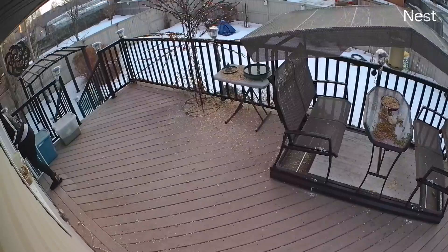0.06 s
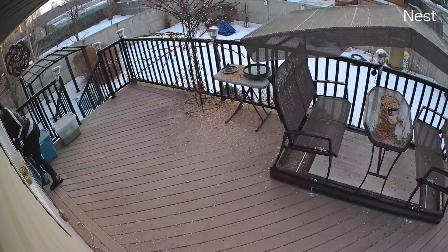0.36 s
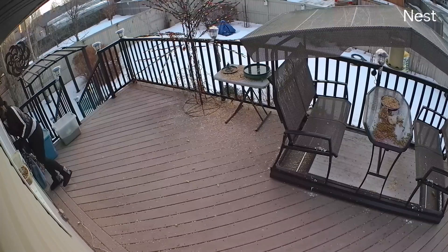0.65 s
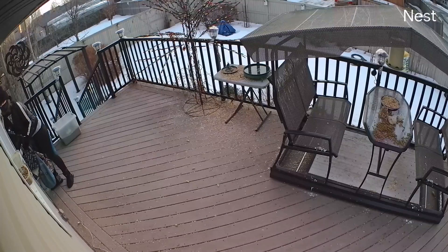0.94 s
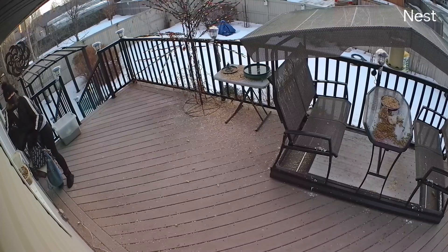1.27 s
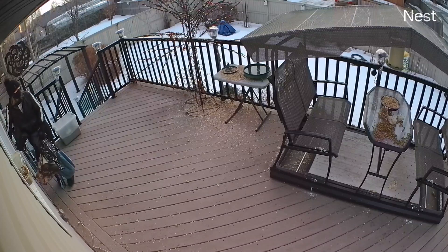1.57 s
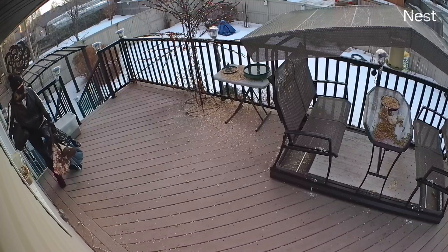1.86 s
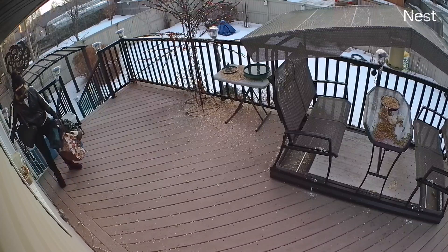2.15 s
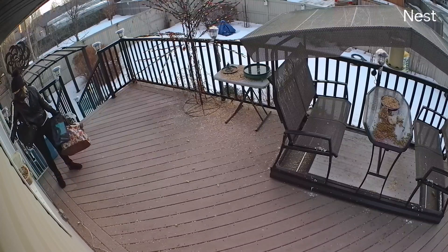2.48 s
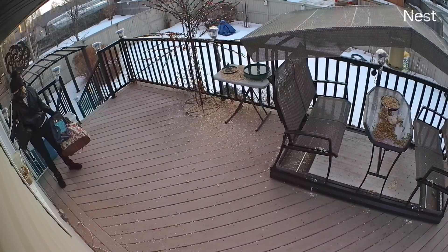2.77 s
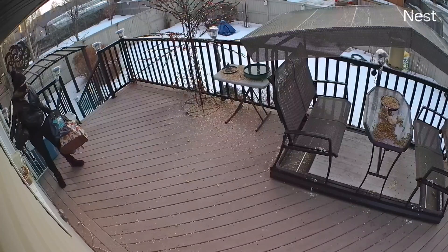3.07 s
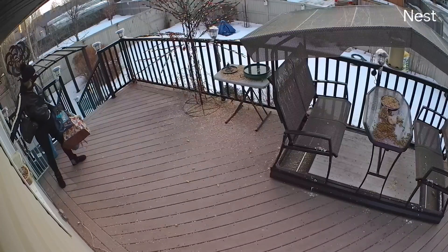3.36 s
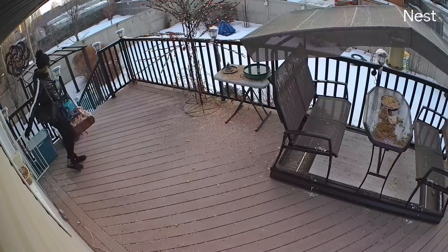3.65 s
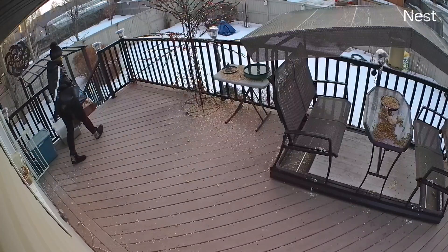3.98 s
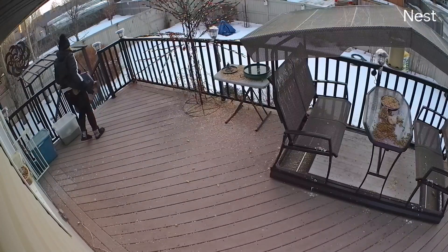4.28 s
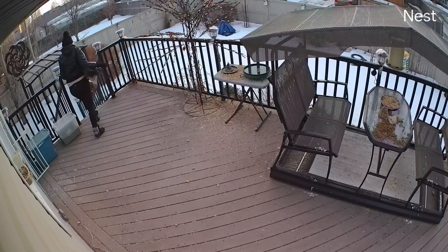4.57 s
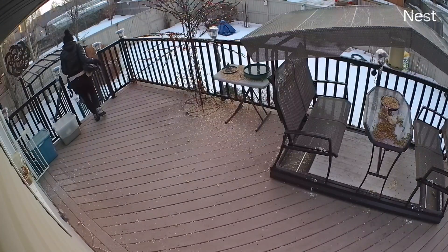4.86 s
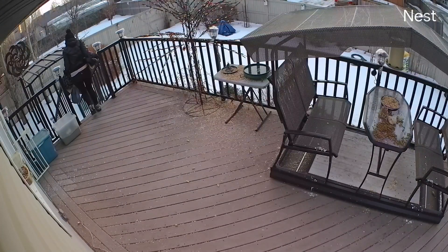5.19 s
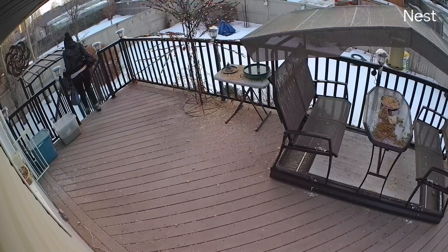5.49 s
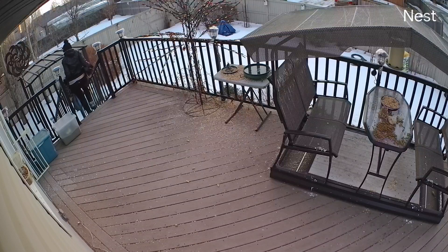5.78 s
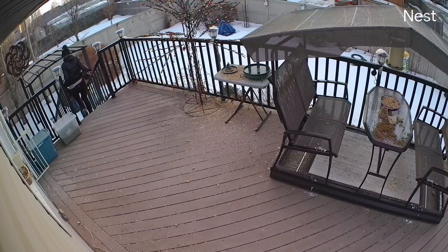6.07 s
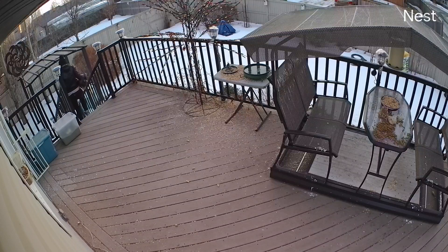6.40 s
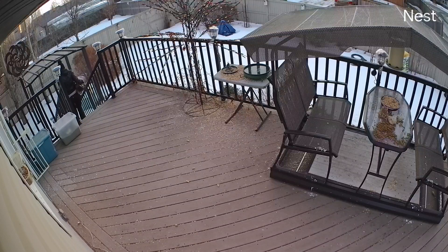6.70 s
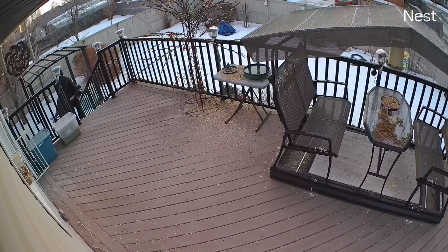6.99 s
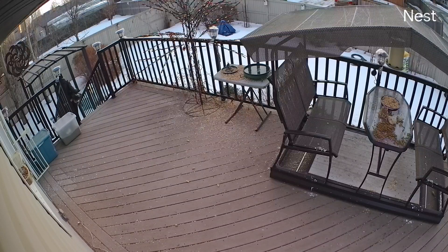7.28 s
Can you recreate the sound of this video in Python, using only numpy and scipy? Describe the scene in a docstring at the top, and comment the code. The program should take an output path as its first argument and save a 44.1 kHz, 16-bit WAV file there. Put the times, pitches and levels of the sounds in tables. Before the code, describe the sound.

The scene is an outdoor wooden deck with a very faint hum of a distant town. It opens quietly, with a soft footstep and a slight brush of paper, then a hollow bump on a stiff paper bag at about 1.5 seconds. At 1.8 seconds the bag is snatched up with a sudden loud crackle, sharp snaps over dense crinkling, easing by 2.6. A second, longer burst, almost like a crash, runs from 2.9 to about 4 seconds and thins to scattered snaps by 4.7. Dull footsteps thud on the boards underneath, the firmest near 3.6, fading after 5. From about 5 seconds a metal gate latch clinks lightly several times with a short ring, quieter than the bag, clearest at 6.3 and 6.6, and stopping near 7. The wall and deck add a brief echo, and a small microphone softens the treble.

```python
"""A paper bag on a wooden deck

A stiff paper gift bag is snatched up at a house door and swung about, crackling as loudly as a crash.
Its large creases buckle with a snap over a dense crinkle of tiny ones, and footfalls set the boards
ringing. Then a gate latch clinks a few times in its metal modes. Wall and deck echo the bag and the
latch, a distant town hums underneath, and a small microphone dulls the treble."""
import sys
import numpy as np
from scipy import signal
from scipy.fft import rfft, irfft
from scipy.io import wavfile

SR = 44100
rng = np.random.default_rng(int(sys.argv[2]) if len(sys.argv) > 2 else 0)


def inscribe(sig):
    """Save sig as 16-bit PCM at rate SR to the path in sys.argv[1].

    A 1-D sig is mono; a 2-D sig holds one channel per row.
    Samples are clipped to [-1, 1] before scaling.
    """
    pcm = np.round(np.clip(np.atleast_2d(sig).T, -1, 1) * 32767)
    wavfile.write(sys.argv[1], SR, pcm.astype(np.int16))


N = 323694


def from_db(db):
    """Amplitude ratio for a level in decibels."""
    return 10 ** (np.asarray(db) / 20)


def unit_rms(x):
    """Normalisation to unit mean power."""
    return x / np.sqrt(np.mean(x ** 2) + 1e-20)


def at_level(sound, db):
    """Energy normalisation: a transient gets the energy of 20 ms at this level."""
    return from_db(db) * sound * np.sqrt(SR / 50 / np.sum(sound ** 2))


def at_hz(points, hz):
    """Interpolation of a spectrum on a logarithmic frequency axis."""
    frequencies, values = np.transpose(points)
    return np.interp(np.log(hz), np.log(frequencies), values)


def band(x, low_hz, high_hz, order=2):
    """Causal band-pass filtering."""
    sos = signal.butter(order, [low_hz, min(high_hz, .45 * SR)], "band", fs=SR, output="sos")
    return signal.sosfilt(sos, x + 1e-18)


def resonance(x, hz, width_hz):
    """A damped resonator with unit gain at its peak."""
    return signal.lfilter(*signal.iirpeak(hz, hz / width_hz, fs=SR), x)


def drift(per_s):
    """Random modulation of unit rms, linear between knots."""
    knots = rng.standard_normal(int(N / SR * per_s) + 2)
    return unit_rms(np.interp(np.arange(N) / SR * per_s, np.arange(len(knots)), knots))


def impulses(per_s, spread_db, size):
    """Shot noise: independent clicks, mostly small and a few large."""
    heights = from_db(spread_db * np.minimum(rng.exponential(1, size), 4))
    return (rng.random(size) < per_s / SR) * heights * rng.choice([-1, 1], size)


def add(out, start_s, sound):
    """Superposition of a sound from a given time on."""
    i = int(start_s * SR)
    out[i:i + len(sound)] += sound[:N - i]


# Spectrum of the town's hum. Each row: frequency in Hz, relative spectral density in dB.
HUM_SPECTRUM = [(25, -10.5), (80, 2.5), (160, -2), (240, -9), (850, -12.5), (1900, -21), (3600, -30.5),
                (10000, -54.5)]
# Course of the hum. Each row: time in seconds, level in dB.
HUM_LEVEL = [(0, -66.5), (2.8, -64), (5.6, -59), (7.34, -59.5)]

def town_hum(waver_db=0.5):
    """Distant sources merge into low broadband noise whose level wavers gently."""
    hz = np.maximum(np.arange(N // 2 + 1) * SR / N, 1)
    wash = irfft(rfft(rng.standard_normal(N)) * from_db(at_hz(HUM_SPECTRUM, hz)), N)
    level_db = np.interp(np.arange(N) / SR, *np.transpose(HUM_LEVEL))
    return unit_rms(wash) * from_db(level_db + waver_db * drift(52))


def microphone_hiss(level_db=-83.5):
    """Self-noise: the microphone adds a steady, band-limited hiss."""
    return from_db(level_db) * unit_rms(band(rng.standard_normal(N), 800, 5000, order=1))


# Steps on deck and stairs. Each row: start in seconds, relative level in dB, pitch most excited in Hz.
FOOTFALLS = [(0.182, -30, 117), (0.202, -38, 380), (1.466, -26.5, 86), (2.209, -28.5, 118),
             (3.119, -26.5, 140), (3.405, -29.5, 114), (3.616, -17.5, 230.8), (3.99, -36.5, 48),
             (4.99, -37, 56), (5.1, -36.5, 56.4), (5.2, -38, 56.4), (5.71, -46.5, 350), (6.122, -48, 370)]
# Modes of the boards. Each row: frequency in Hz, relative level in dB, 60 dB decay time in seconds.
BOARD_MODES = [(55.7, -3.5, 0.55), (93.5, 1.5, 0.17), (118, 0.5, 0.12), (171, -1.5, 0.11), (222, -3, .11),
               (335, 2.5, 0.092)]

def footfalls(swell_cycles=1.22, focus_db_per_octave=15, gain_db=3):
    """Modal excitation: a soft impact drives the modes nearest its pitch; low modes swell more slowly."""
    out, t = np.zeros(N), np.arange(SR) / SR
    for start, db, pitch_hz in FOOTFALLS:
        for hz, mode_db, t60 in BOARD_MODES:
            swell = 1 - np.exp(-(t * hz / swell_cycles) ** 2)
            level_db = db + gain_db + mode_db - focus_db_per_octave * abs(np.log2(hz / pitch_hz))
            tone = np.sin(2 * np.pi * (hz * t + rng.random()))
            add(out, start, from_db(level_db - 60 * t / t60) * swell * tone)
    return out


# Moves of the bag: brush, brush, bump, grip, snatch, lift, slide, tug, swing, swing back, settle.
# Each row: end of attack, hold and release in seconds, relative levels of crumpling and flexing in dB.
BAG_MOVES = [(.39, .02, 0.092, -68, -77.5), (0.779, 0.048, 0.057, -55.5, -69.5),
             (1.49, 0.01, 0.33, -47, -44.5), (1.772, .02, 0.2, -41.5, -62.5),
             (1.857, 0.098, .3, -25.5, -36.5), (2.084, .32, .55, -34, -42), (2.696, .17, .1, -57, -63.5),
             (3.099, 0.11, 0.5, -30.5, -34.5), (3.354, 0.14, .4, -23.5, -26),
             (3.678, 0.031, 0.99, -22.5, -30), (4.383, 0.09, 0.34, -42.5, -50.5)]

def handling(attack_s=0.04, release_power=2.68):
    """Incoherent addition: the moves sum in power, giving the crumpling and flexing levels in dB."""
    t, power = np.arange(N) / SR, 1e-11
    for onset, hold, release, *levels_db in BAG_MOVES:
        attack = np.clip(1 + (t - onset) / attack_s, 0, 1)
        fade = np.clip(1 - (t - onset - hold) / release, 0, 1) ** release_power
        power = power + (from_db(levels_db)[:, None] * attack * fade) ** 2
    return 10 * np.log10(power)


# Spectrum of the crinkle. Each row: frequency in Hz, relative half-octave level in dB.
CRINKLE_SPECTRUM = [(70, -20), (150, -14.5), (230, -11.5), (420, -6.5), (650, 0), (1000, -11), (1700, -1.5),
                    (3000, -2.5), (5000, 2), (7000, -7.5), (9500, -37.5)]

def crinkle(per_s=1500, hiss_db=-10, colour_db=4, clump_db=0.8, patchy_db=2.5, flex_hz=900, fine_hz=2100):
    """Crackling noise of tiny creases: the lows follow the flexing panels, the highs the crumpling."""
    crumple_db, flex_db = handling()
    clumps_db = clump_db * drift(90)
    clicks = impulses(per_s, spread_db=3, size=N)
    out, edges_hz = 0, 55 * 2 ** (np.arange(16) / 2)
    for low, high in zip(edges_hz, edges_hz[1:]):
        hz = np.sqrt(low * high)
        fine_share = at_hz([(flex_hz, 0), (fine_hz, 1)], hz)
        drive_db = (1 - fine_share) * flex_db + fine_share * crumple_db
        db = at_hz(CRINKLE_SPECTRUM, hz) + drive_db + clumps_db + patchy_db * drift(45)
        # new weights in every band give each click its own colour
        weights = from_db(colour_db * rng.uniform(-1.4, 1, N)) * rng.choice([-1, 1], N)
        crackle = unit_rms(clicks * weights) + from_db(hiss_db) * rng.standard_normal(N)
        out = out + from_db(db) * unit_rms(band(crackle, low, high))
    return out


# Resonances of the bag. Each row: frequency in Hz, bandwidth in Hz, gain in dB.
BAG_RESONANCES = [(324, 13, -26.5), (557, 120, -2.5), (696, 91, 2.5), (1372, 300, -2), (2640, 230, -11.5),
                  (3614, 180, -15.5)]

def bag_body(x):
    """Forced vibration: the panels and the hollow of the bag ring briefly with every crease."""
    return x + sum(from_db(db) * resonance(x, hz, width) for hz, width, db in BAG_RESONANCES)


# Knocks on the whole bag. Each row: start in seconds, peak level in dB, pitch of the panel in Hz.
BAG_BUMPS = [(.765, -51, 604), (1.471, -21.5, 700), (2.636, -23, 1022)]

def bumps(swell_cycles=1.6):
    """Heavily damped vibration: a slack panel swells and dies with a hollow note."""
    out, t = np.zeros(N), np.arange(SR // 5) / SR
    for start, db, hz in BAG_BUMPS:
        age = t * hz / swell_cycles
        envelope = np.sqrt(age * np.exp(1 - age))
        add(out, start, from_db(db) * envelope * np.sin(2 * np.pi * hz * t))
    return out


# The bag slides over coat and boards. Each row: centre time and standard deviation in seconds,
# pitch and resonator bandwidth in Hz, level at the centre in dB.
BAG_RUBS = [(.835, 0.0088, 3900, 1500, -55), (1.47, 0.0074, 3000, 400, -51.5), (2.5, 0.26, 135, 70, -53),
            (2.8, .065, 3560, 260, -55.5), (4.87, 0.19, 2500, 1300, -65.5)]

def rubs():
    """Sliding friction makes a band of noise that swells and fades in a bell curve."""
    out, t = 0, np.arange(N) / SR
    for centre, sigma, hz, width_hz, db in BAG_RUBS:
        friction = resonance(resonance(rng.standard_normal(N), hz, width_hz), hz, width_hz)
        envelope = np.exp(-((t - centre) / sigma) ** 2 / 2)
        out = out + from_db(db) * unit_rms(friction) * envelope
    return out


def small_creases(per_s=14, threshold_db=-46, spread_db=3, low_hz=1400, high_hz=4200, decay_s=.0016):
    """Threshold buckling: lesser creases yield at random under hard handling; gives rows for snaps()."""
    crumple_db, flex_db = handling()
    rows = []
    for slot, (when, pitch, crack, body) in enumerate(rng.random((200, 4))):
        start = (slot + when) / per_s
        i = int(start * SR)
        if i < N and crumple_db[i] > threshold_db:
            crack_db = crumple_db[i] - 6 + spread_db * (2 * crack - 1)
            body_db = flex_db[i] - 5 + spread_db * (2 * body - 1)
            rows.append((start, crack_db, body_db, low_hz * (high_hz / low_hz) ** pitch, decay_s))
    return rows


# Large creases buckling. Each row: start in seconds, relative levels of the crack and of the hollow
# body in dB, pitch of the crack in Hz, time constant of the flutter in seconds.
LARGE_CREASES = [(1.771, -29.5, -39.5, 1510, 0.0078), (1.829, -30, -32, 1460, 0.005),
                 (1.843, -15, -23, 1450, 0.0049), (1.879, -13.5, -24, 1840, 0.0052),
                 (1.9, -17, -20.5, 2960, 0.0052), (1.939, -25.5, -29, 3280, .004),
                 (1.979, -29, -30.5, 2600, 0.005), (2.056, -27.5, -36, 2200, 0.0027),
                 (2.089, -26, -60, 3650, 0.0045), (2.136, -24.5, -28, 3300, 0.0055),
                 (2.159, -17.5, -49, 3470, 0.0029), (2.247, -29, -36.5, 3340, 0.0059),
                 (2.28, -26, -26.5, 3730, 0.0058), (2.312, -21.5, -23, 2400, 0.0069),
                 (2.376, -25.5, -29, 3074, 0.0084), (2.426, -31, -34.5, 1350, 0.0025),
                 (2.469, -34.5, -38, 3500, 0.0044), (2.524, -36, -58, 3850, 0.0041),
                 (2.636, -37.5, -33.5, 1150, 0.0037), (2.905, -15.5, -13.5, 4100, 0.004),
                 (3.014, -12, -27, 2600, .007), (3.046, -20, -29, 3200, 0.005),
                 (3.116, -29, -22, 3000, 0.0057), (3.145, -32, -21, 1400, 0.015),
                 (3.358, -14.5, -21.5, 2600, 0.0077), (3.383, -12.5, -18.5, 2090, 0.005),
                 (3.432, -16, -19.5, 1580, 0.0026), (3.503, -24, -31.5, 3965, 0.0018),
                 (3.532, -16, -16, 2390, .005), (3.581, -18.5, -29, 1440, 0.0033),
                 (3.614, -16, -14, 1400, 0.011), (3.663, -17, -16.5, 1600, .006),
                 (3.699, -17.5, -18, 3500, 0.0031), (3.717, -24, -26, 3500, 0.0067),
                 (3.809, -23, -40.5, 3000, 0.0025), (3.857, -24, -26, 2900, 0.0058),
                 (3.903, -28, -26, 1440, 0.0042), (3.94, -25.5, -27, 2500, 0.0029),
                 (4.018, -28.5, -17.5, 1400, 0.0035), (4.062, -22.5, -30.5, 1560, 0.0044),
                 (4.238, -16, -22, 2250, 0.0025), (4.32, -28.5, -24.5, 1300, 0.0049),
                 (4.404, -26.5, -44, 3120, 0.0022), (4.424, -40, -32, 2120, 0.011),
                 (4.521, -25.5, -34.5, 3600, 0.0035), (4.652, -43, -80, 3300, 0.0063)]

def snaps(edges_hz=(370, 1100, 3900, 7400), click_heights=(2.2, -2.1, 1.1), facet_db=13,
          strain_db=-29, strain_s=0.0088, rebound_db=-15, rebound_s=.01):
    """Snap-through buckling: a crease ticks under strain, pops over, and the sheet flutters."""
    pop = SR // 80  # sample at which the crease flips
    out, t = np.zeros(N), np.arange(-pop, SR // 10) / SR
    after = np.maximum(t, 0)
    strain = from_db(strain_db) * np.exp(-abs(t) / strain_s)
    for start, crack_db, body_db, crack_hz, decay in LARGE_CREASES + small_creases():
        click = rng.choice([-1, 1]) * np.exp(-decay / 0.0029)  # a long crease starts more gently
        # a small, high-pitched facet and a long flutter both add treble
        treble_db = crack_db - 13 + 13 * np.log2(crack_hz / 2500) + 9.5 * np.log2(decay / .004)
        release = np.exp(-after / decay) * (1 - np.exp(-after / (0.47 * decay)))
        rebound = from_db(rebound_db) * (t > rebound_s) * np.exp(-abs(t - rebound_s) / decay)
        for k, db in enumerate([body_db, crack_db, treble_db]):
            flutter = impulses(per_s=4000, spread_db=3.5, size=len(t)) * (strain + release + rebound)
            flutter /= np.linalg.norm(flutter)
            flutter[pop] = click_heights[k] * click
            sound = band(flutter, edges_hz[k], edges_hz[k + 1], order=3)
            if k == 1:  # the facet that flips has a pitch of its own
                sound = sound + from_db(facet_db) * resonance(sound, crack_hz, width_hz=900)
            add(out, start + t[0], at_level(sound, db))
    return out


def chatter(t, rise_s=0.0022, bounce_s=0.011, approach_s=0.0062, scrape_s=0.074, scrape_db=-14,
            direct_db=-9, count=18):
    """Repeated contact: loose metal slides in, bounces and scrapes on, waking short-lived resonances."""
    before, after = np.minimum(t, 0), np.maximum(t, 0)
    bounce = (1 - np.exp(-after / rise_s)) * np.exp(-after / bounce_s)
    scrape = from_db(scrape_db) * np.exp(before / approach_s - after / scrape_s)
    contacts = impulses(per_s=3500, spread_db=3.2, size=len(t)) * (bounce + scrape) + 1e-18
    pitches_hz = 1450 * (9300 / 1450) ** ((np.arange(count) + rng.random(count)) / count)
    ringing = sum(from_db(0.65 * rng.normal()) * resonance(contacts, hz, width_hz=170)
                  for hz in pitches_hz)
    return from_db(direct_db) * contacts + ringing


# Blows of the latch. Each row: time in seconds, relative chatter level in dB, tilt in dB per octave,
# frequency of the leading mode in Hz, its level in dB.
LATCH_BLOWS = [(5.065, -56, 7, 6555, -45), (5.469, -56, -3, 2980, -41), (5.474, -76, 0, 1134, -54),
               (5.608, -62, -6, 1590, -69), (5.643, -50, -2.5, 1590, -50), (5.658, -51.5, -5, 1841, -55),
               (5.705, -54.5, -6.5, 1841, -49.5), (6.073, -51, -4, 1590, -39.5),
               (6.13, -56, -4.5, 5130, -54), (6.323, -40, 0, 2229, -23), (6.371, -41.5, 2.5, 3780, -34.5),
               (6.478, -42, 2, 3971, -40), (6.568, -52, 7, 6555, -42.5), (6.635, -33, 1, 2000, -21),
               (6.695, -45.5, 3, 7250, -30), (6.797, -52.5, -0.5, 1841, -56), (6.906, -66, -5.5, 6555, -70)]
# Modes of the latch. Each row: frequency in Hz, relative level in dB, 60 dB decay time in seconds.
LATCH_MODES = [(1134, -16, 0.34), (1590, 0, 0.11), (1841, -8, 0.26), (2000, 0, 0.23), (2229, -23, 0.063),
               (2500, -15, 0.14), (2980, -20, 0.15), (3780, 2.5, 0.16), (3971, 11, 0.11), (5130, 3, .12),
               (6555, -9, 0.35), (6730, 13.5, 0.058), (7250, 6, 0.036), (8740, -15, .11), (9040, 0.5, 0.18)]

def latch(edges_hz=(1500, 2600, 5500, 8200), colour_db=(-2, 1.5, -5.5), slide_s=.04, rise_s=0.0014,
          ring_db=-8, vary_db=6.5, beat_hz=17, twin_db=-10, post_db=-13):
    """Free vibration after impact: a blow chatters and all modes ring; where it lands picks the lead."""
    out, t = np.zeros(N), np.arange(SR // 2) / SR
    centres_hz = np.sqrt(np.multiply(edges_hz[:-1], edges_hz[1:]))
    rise = 1 - np.exp(-t / rise_s)
    for strike, chatter_db, tilt, lead_hz, lead_db in LATCH_BLOWS:
        bands_db = chatter_db + np.array(colour_db) + tilt * np.log2(centres_hz / centres_hz[1])
        rattle = chatter(t - slide_s)  # the parts scrape before they strike
        post_knock = resonance(band(rattle, 400, 1200), hz=713, width_hz=120)
        add(out, strike - slide_s, at_level(post_knock, bands_db[0] + post_db))
        for low, high, db in zip(edges_hz, edges_hz[1:], bands_db):
            add(out, strike - slide_s, at_level(band(rattle, low, high, order=4), db))
        lead = np.argmin([abs(mode[0] - lead_hz) for mode in LATCH_MODES])
        for k, (hz, mode_db, t60) in enumerate(LATCH_MODES):
            drive_db = at_hz(list(zip(centres_hz, bands_db)), hz) + vary_db * rng.normal()
            level_db = lead_db if k == lead else drive_db + ring_db + mode_db
            phase = 2 * np.pi * (hz * t + rng.random())
            beat_phase = 2 * np.pi * beat_hz * rng.uniform(1, 3.5) * t
            twin = from_db(twin_db) * np.sin(phase + beat_phase)  # a close second mode beats with it
            add(out, strike, rise * from_db(level_db - 60 * t / t60) * (np.sin(phase) + twin))
    return out


# Reflections from wall and deck. Each row: delay in seconds, relative level in dB.
REFLECTIONS = [(.0034, -12.5), (0.0111, -10), (.0175, -13.5), (.026, -14)]

def porch(x, echo_db, tail_db, low_t60, high_t60):
    """Reflection and scattering: a few hard echoes, and a thin tail from railings and furniture."""
    t = np.arange(SR * 3 // 4) / SR
    scatter = sum(band(rng.standard_normal(len(t)), low_hz, high_hz) * from_db(-60 * t / t60)
                  for low_hz, high_hz, t60 in [(202, 4500, low_t60), (1450, 5200, high_t60)])
    scatter *= 1 - np.exp(-t / 0.0013)
    response = from_db(tail_db) * scatter / np.linalg.norm(scatter)
    for delay, db in REFLECTIONS:
        response[int(delay * SR)] += from_db(db + echo_db)
    return x + signal.fftconvolve(x, response)[:N]


def scene():
    """Superposition of all sources; the bag and the latch each get their own share of the echo."""
    surroundings = town_hum() + microphone_hiss() + footfalls()
    creases = from_db(-7.0) * crinkle() + from_db(-3.5) * snaps()
    paper = bag_body(creases) + bumps() + rubs()
    bag = porch(paper, echo_db=-9, tail_db=-15.5, low_t60=.22, high_t60=0.32)
    gate = porch(latch(), echo_db=-10.5, tail_db=-17.0, low_t60=0.6, high_t60=0.12)
    return (surroundings + bag + gate)[None]


def record(dry, ceiling=.85, cutoff_hz=10200):
    """Band limiting and saturation: the small microphone loses the top octave and rounds the peaks."""
    dull = signal.sosfilt(signal.butter(6, 8800, fs=SR, output="sos"), dry)
    rounded = dull / (1 + (dull / ceiling) ** 4) ** .25
    return signal.sosfilt(signal.ellip(10, .3, 70, cutoff_hz, fs=SR, output="sos"), rounded)


dry = scene()
out = record(dry)
inscribe(out)
```